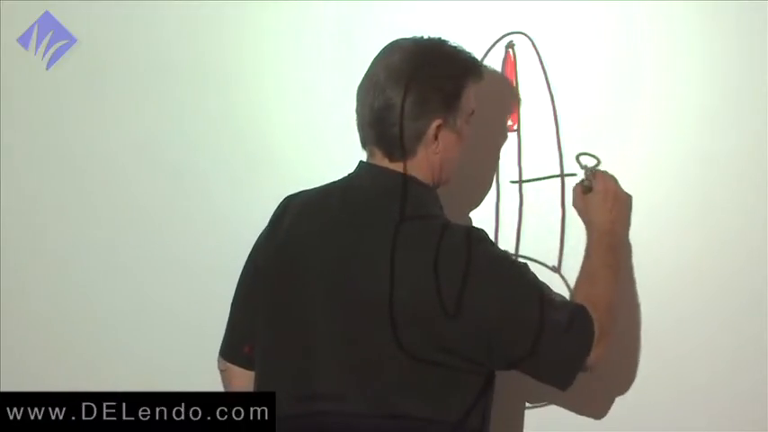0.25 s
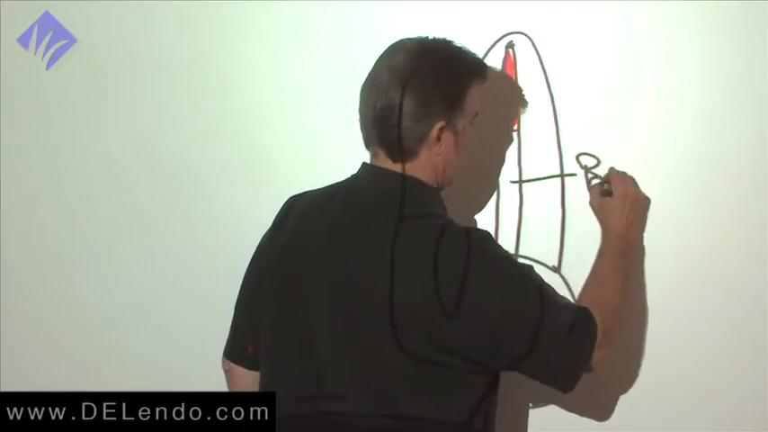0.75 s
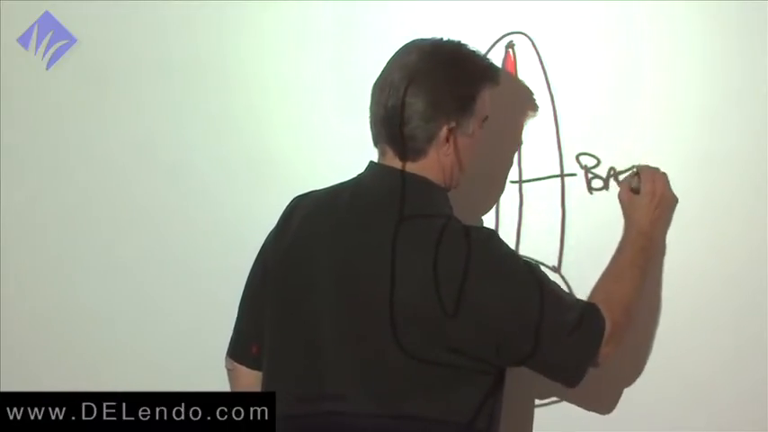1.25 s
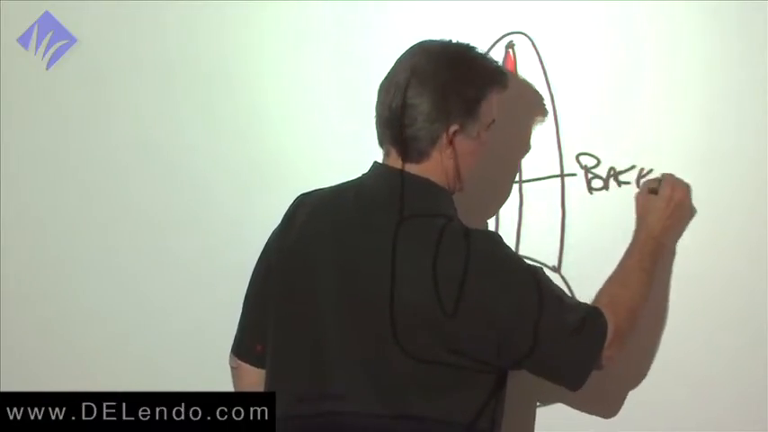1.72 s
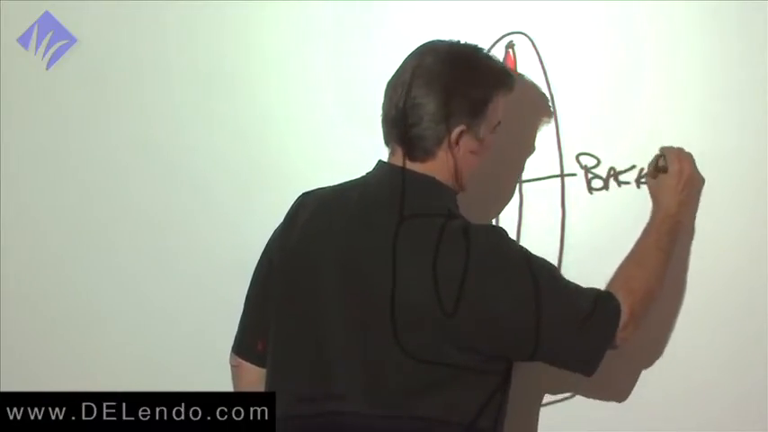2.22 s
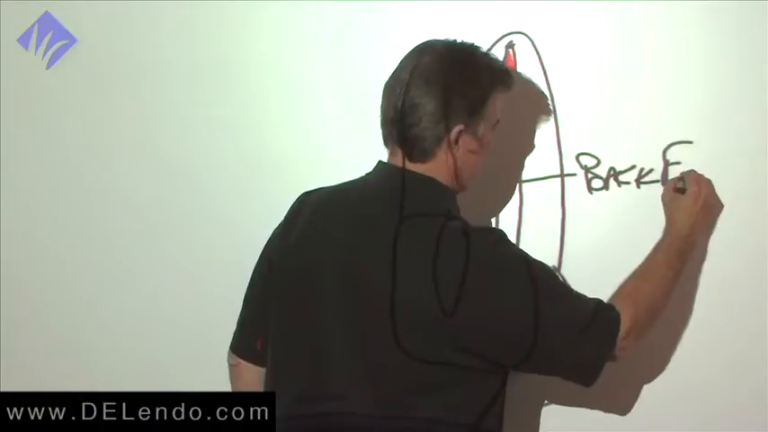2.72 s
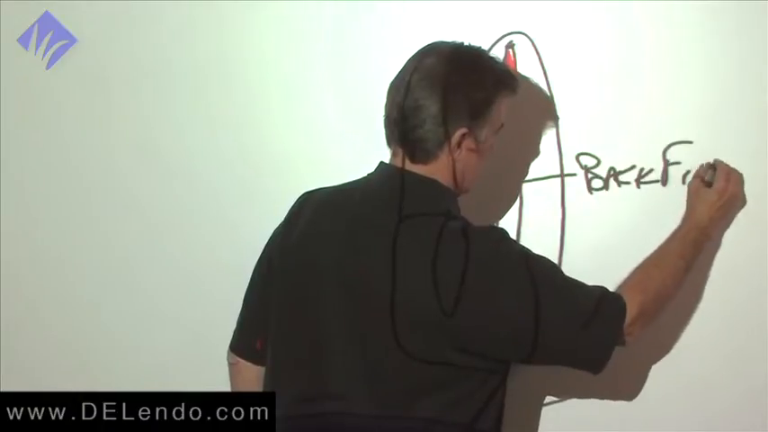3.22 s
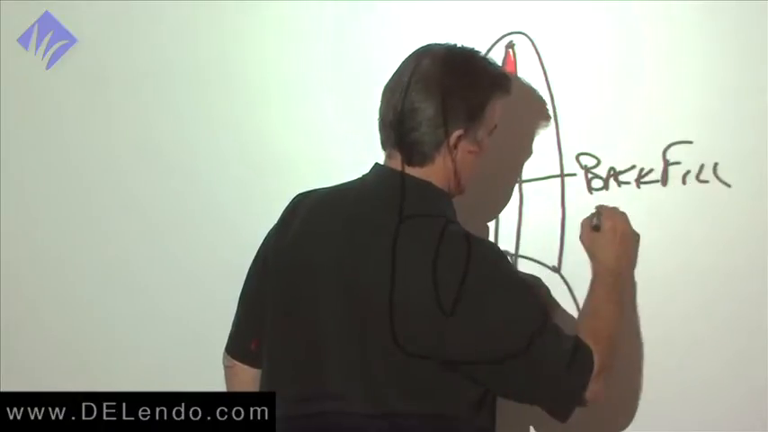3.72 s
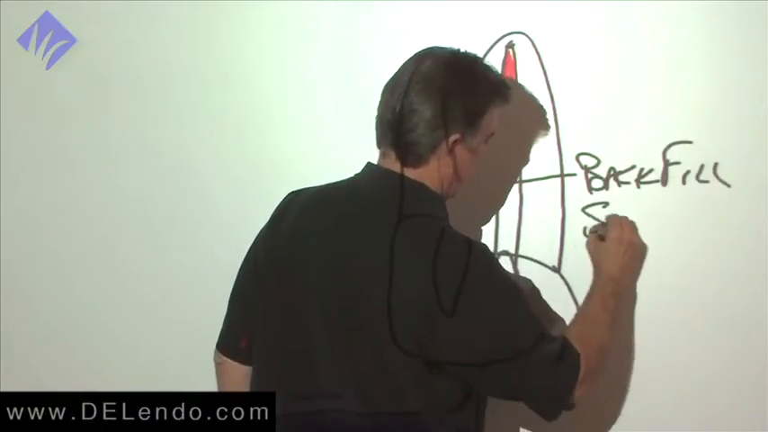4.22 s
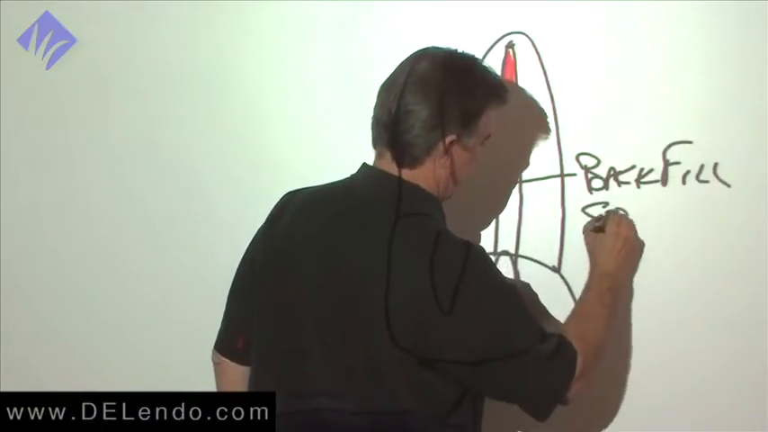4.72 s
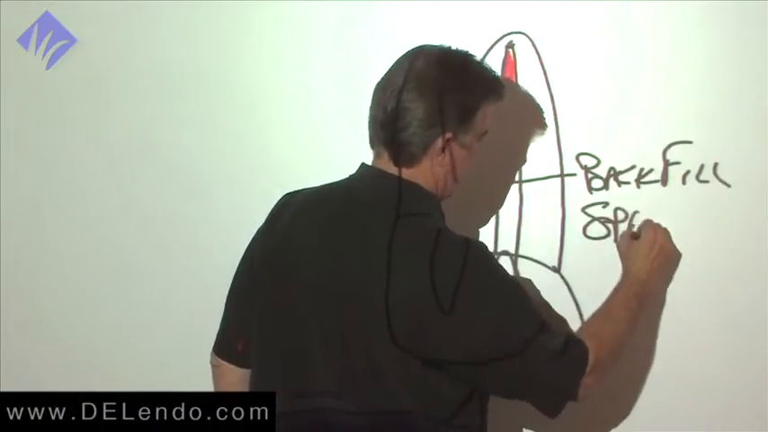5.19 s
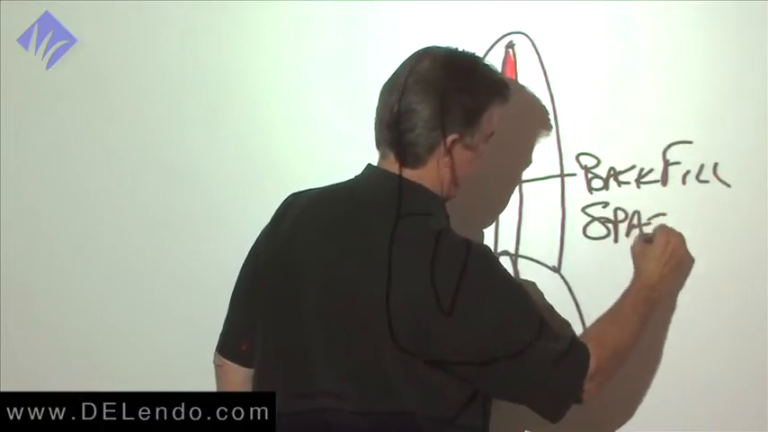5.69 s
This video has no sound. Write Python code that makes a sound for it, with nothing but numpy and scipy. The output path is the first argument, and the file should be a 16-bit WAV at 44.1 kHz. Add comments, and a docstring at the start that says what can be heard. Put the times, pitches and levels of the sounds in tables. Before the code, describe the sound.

In a small quiet room, a marker tip knocks and rubs across a ringing board in irregular bursts. Early strokes are run together and muffled, then firmer knocks come, two of them notably hard before three seconds. After a short pause the writing continues with steady low scuffs and lighter taps. Soft air noise, a low hum and a barely audible high whistle stay beneath; fairly close, slightly roomy pickup.

```python
"""Marker on a whiteboard, small room

A felt marker prints capital letters on a wall-hung whiteboard in a small, quiet room.
At each touch the tip ticks, then the nib seats in its barrel with a crack and thumps the ringing panel.
While it slides, the felt hisses and its tiny slips make the panel judder.
Reflections follow the marker's sound; soft room tone, a low hum and a thin whistle lie beneath."""
import sys
import numpy as np
from scipy import signal
from scipy.fft import rfft, irfft
from scipy.io import wavfile
from scipy.ndimage import uniform_filter1d

SR = 44100
rng = np.random.default_rng(int(sys.argv[2]) if len(sys.argv) > 2 else 0)


def file_out(sig):
    """Save sig as 16-bit WAV at sys.argv[1]."""
    # one column per channel
    cols = np.atleast_2d(sig).T
    # limit, then scale
    lim = np.clip(cols, -1, 1)
    pcm = np.round(lim * 32767).astype(np.int16)
    wavfile.write(sys.argv[1], SR, pcm)


N = 262395  # length in samples

# Room tone spectrum. Each row: frequency in Hz, relative level in dB.
ROOM_TONE_SPECTRUM = [(20, -18), (45, 4), (110, 3), (170, -1.5), (310, -4), (480, -12.5), (1000, -13),
                      (2000, -25), (4000, -30), (9000, -34), (16000, -35)]
# Steady electrical tones: hum and whistle. Each row: frequency in Hz, mean peak level in dB.
ELECTRICAL_TONES = [(58.7, -44.5), (118, -57.5), (15734, -71.5)]
# Strokes of the letters. Each row: start in seconds, length in seconds, fastest moment as a share
# of the length (0-1), judder in dB, sharp slips relative to the judder in dB, hiss in dB, sizzle in dB.
LETTER_STROKES = [(0.014, .13, 0.55, -35.5, -9, -62, -65), (0.13, 0.081, 0.38, -43, -6.5, -63, -62),
                  (0.203, 0.23, 0.16, -42.5, -8.5, -66, -68), (0.433, 0.13, 0.24, -42, -4, -64.5, -62.5),
                  (0.561, 0.12, .45, -48, -7, -62.5, -65), (0.793, 0.13, 0.57, -40, -6.5, -65, -66),
                  (0.939, 0.11, 0.28, -39.5, -7.5, -62, -62), (1.039, 0.096, .55, -39.5, -7, -63.5, -66),
                  (1.232, 0.13, 0.37, -43, -13, -63.5, -67.5), (1.498, 0.14, .52, -43.5, -8, -64, -64),
                  (1.63, 0.098, 0.63, -36, -7.5, -63, -62), (1.924, 0.13, 0.3, -34.5, -12, -63, -68),
                  (2.069, .17, 0.45, -37.5, -9.5, -65.5, -70), (2.196, 0.095, 0.82, -46.5, -4.5, -65, -59),
                  (2.277, 0.058, .45, -36.5, -10, -62, -66), (2.504, 0.13, .35, -35, -8, -64, -68),
                  (2.67, 0.11, 0.25, -41.5, -8, -66.5, -69), (2.922, 0.11, 0.24, -37.5, 1, -63, -71),
                  (3.0, 0.15, 0.38, -44.5, 1, -67, -67), (3.215, 0.076, .4, -46, -9, -61.5, -73),
                  (3.277, 0.093, .68, -41.5, -2.5, -64, -63), (3.72, 0.069, 0.33, -39.5, -8, -65, -66),
                  (3.794, 0.12, 0.37, -40, -10, -58.5, -62), (3.903, 0.12, 0.44, -35, -6, -59.5, -67),
                  (4.02, 0.093, 0.45, -42.5, -7, -62.5, -61.5), (4.109, 0.12, 0.42, -33, -5.5, -62.5, -66),
                  (4.211, 0.12, 0.22, -43.5, -5.5, -61.5, -64), (4.358, 0.18, 0.29, -40, -5.5, -62.5, -66),
                  (4.506, 0.1, 0.4, -49.5, -8.5, -66.5, -68), (4.587, 0.1, 0.45, -45, -7, -64, -63),
                  (4.841, .1, .35, -36.5, -11.5, -65, -69), (4.942, 0.15, 0.5, -35.5, -9.5, -63.5, -69),
                  (5.084, .15, 0.53, -39.5, -8, -62.5, -64.5), (5.347, 0.097, .5, -40.5, -8, -64, -66.5),
                  (5.511, 0.11, 0.64, -44.5, -11, -64, -62.5), (5.613, 0.097, 0.43, -38, -9, -62.5, -63)]
# Ringing modes of the panel. Each row: frequency in Hz, relative level in dB.
PANEL_RING_MODES = [(102, -12), (171, -9), (230, -7), (265, -6), (291, -4), (309, 1), (350, -7), (393, -4),
                    (445, -1), (505, -7), (545, -6), (571, -3), (612, -5), (645, -6), (734, -4), (846, -4),
                    (875, -1), (930, -7), (1022, -3), (1057, -7), (1098, -7), (1318, -19), (1367, -20),
                    (1510, -27), (1669, -29)]
# The panel's damped thud, as a spectrum. Each row: frequency in Hz, relative level in dB.
PANEL_THUD_SPECTRUM = [(30, -17), (90, -12.5), (160, -8), (210, -6.5), (295, 2), (365, -3.5), (450, -5),
                       (720, -5), (1050, -4), (1320, -18.5), (1900, -29), (2700, -40.5), (4500, -46.5),
                       (14000, -68.5)]
# Push of a soft slip on the panel, as a spectrum. Each row: frequency in Hz, relative level in dB.
SOFT_SLIP_SPECTRUM = [(60, -17), (170, -1.5), (300, -2), (440, -5.5), (590, -11.5), (1500, -33)]
# Push of a sharp slip, reaching the upper modes. Each row: frequency in Hz, relative level in dB.
SHARP_SLIP_SPECTRUM = [(300, -31), (520, -1), (735, 5), (900, -1.5), (1100, -6.5), (1600, -2.5), (4000, -6)]
# Felt hiss in the barrel's range. Each row: frequency in Hz, relative level in dB.
HISS_SPECTRUM = [(700, -0.5), (1600, 2.5), (2600, -8.5), (3700, -2), (5000, -1.5), (6200, -6), (7500, -9.5),
                 (9000, -12), (10500, -16), (16000, -44)]
# Fine felt sizzle above the hiss. Each row: frequency in Hz, relative level in dB.
SIZZLE_SPECTRUM = [(7000, -14.5), (10000, -10.5), (12500, -1), (14000, -1.5), (15500, 7.5), (16000, -25)]
# Marker meets board. Each row: moment the nib seats in seconds, speed of approach in m/s,
# thump in dB, hardness of the blow in dB.
BOARD_TOUCHES = [(0.7626, .17, -25, -14), (1.2152, 0.22, -23.5, -9), (1.4775, 0.25, -18, -11),
                 (1.9204, 0.35, -18, -9), (2.49, 0.61, -12.5, -2.16), (2.6607, .32, -21, -12.5),
                 (2.906, 0.68, -13.5, 1), (3.198, 0.43, -20, -4.5), (3.721, 0.3, -19.5, -8.5),
                 (4.827, .52, -18.5, -12), (5.3123, 0.22, -25, -20.5), (5.5059, 0.07, -31.5, -15),
                 (5.9372, 0.21, -24, -10)]
# The tip's tick, as a spectrum. Each row: frequency in Hz, relative level in dB.
TICK_SPECTRUM = [(500, -2.5), (2300, -11), (3500, -7.5), (5300, 1.5), (7300, -5), (10000, -15.5),
                 (16000, -25)]
# The barrel's crack, as a spectrum. Each row: frequency in Hz, relative level in dB.
CRACK_SPECTRUM = [(1000, 0.5), (2700, -14.5), (3700, -8.5), (5500, -20.5), (7500, -25.5), (10000, -37),
                  (16000, -35)]

ROOM_TONE_DB = -54  # mean level
# each layer grows as this power of the nib's speed: the judder needs more pace than hiss or sizzle
JUDDER_POWER, HISS_POWER, SIZZLE_POWER = 1.84, 0.39, 0.54
PANEL_T60_S = 0.26  # ring time at 400 Hz
RING_DB = -10  # gain of the ring when added to the thud
DISPERSION_S = 0.000774  # delay of bending waves at 300 Hz
NIB_PLAY_M = 0.001  # how far the nib slides back before it seats
TICK_DB, TICK_POWER = -34, 1.34  # the tip's tick at 1 m/s, and its growth with speed
CRACK_DB = -17  # the barrel's crack, relative to the thump
ROOM_T60_S, ROOM_T60_TREBLE_S = 0.36, 0.12
ROOM_DB, ROOM_TREBLE_DB = -9, -12.5  # gains of the two reflection bands
TOP_HZ = 16000  # top of the recorder's range


def amp(db):
    """Decibels to gain."""
    return 10 ** (np.asarray(db) / 20)


def unit(x):
    """Scale to rms 1."""
    return x / np.sqrt(np.mean(x ** 2))


def burst(x, seconds):
    """Scale a short sound to the energy of so many seconds at rms 1."""
    return x * np.sqrt(seconds * SR / np.sum(x ** 2))


def colour(points, size=4096):
    """Minimum-phase impulse response with the given (Hz, dB) spectrum, by folding the cepstrum."""
    hz, db = np.transpose(points)
    bins = np.maximum(np.arange(size // 2 + 1) * SR / size, 1)
    level_db = np.interp(np.log(bins), np.log(hz), db)
    cepstrum = irfft(np.log(amp(level_db)))
    cepstrum[1:size // 2] *= 2
    cepstrum[size // 2 + 1:] = 0
    return irfft(np.exp(rfft(cepstrum)))


def through(x, response):
    """Filter by an impulse response, keeping the length."""
    return signal.fftconvolve(x, response)[:len(x)]


def add(track, s, sound):
    """Mix a sound into the track at time s."""
    i = int(s * SR)
    track[i:i + len(sound)] += sound[:max(N - i, 0)]


def walk(rate):
    """Random levels held 1 / rate s and slewed twice, at rms 1."""
    hold = max(int(SR / rate), 1)
    steps = np.repeat(rng.standard_normal(N // hold + 1), hold)
    slewed = uniform_filter1d(uniform_filter1d(steps, hold), hold)
    return unit(slewed[:N])


def grains(rate, spread_db):
    """Tiny slips at random moments, rate per second on average, a few larger than the rest."""
    sizes = amp(spread_db * np.minimum(rng.exponential(size=N), 4))
    happens = rng.random(N) < rate / SR
    return unit(happens * sizes * rng.choice([-1, 1], N))


def background():
    """Soft room tone, a slightly wavering hum and the thin whistle of a picture tube."""
    t = np.arange(N) / SR
    air = unit(through(rng.standard_normal(N), colour(ROOM_TONE_SPECTRUM)))
    out = air * amp(ROOM_TONE_DB + 0.92 * walk(3.97))
    for hz, db in ELECTRICAL_TONES:
        level = amp(db + 0.31 * walk(8.7))
        out += level * np.sin(2 * np.pi * hz * t + 0.1 * walk(10))
    return out


def stroke_speed(length_s, fastest):
    """The hand gathers pace, is fastest part-way through the stroke and slows to rest (0-1)."""
    progress = np.linspace(0, 1, int(length_s * SR))
    peak = np.clip(fastest, 0.1, 0.9)
    half_turns = np.interp(progress, [0, peak, 1], [0, 0.5, 1])
    return np.abs(np.sin(np.pi * half_turns))


def stroke_levels():
    """Gains of the soft slips, sharp slips, hiss and sizzle; all follow the speed of the nib."""
    soft, sharp, hiss, sizzle = np.zeros((4, N))
    for s, length_s, fastest, judder_db, sharp_db, hiss_db, sizzle_db in LETTER_STROKES:
        speed = stroke_speed(length_s, fastest)
        add(soft, s, amp(judder_db) * speed ** JUDDER_POWER)
        add(sharp, s, amp(judder_db + sharp_db) * speed ** JUDDER_POWER)
        add(hiss, s, amp(hiss_db) * speed ** HISS_POWER)
        add(sizzle, s, amp(sizzle_db) * speed ** SIZZLE_POWER)
    return soft, sharp, hiss, sizzle


def panel_response():
    """The panel's answer to a blow at one spot: a broad, quickly damped thud, then its modes ring on."""
    t = np.arange(SR // 2) / SR
    thud = colour(PANEL_THUD_SPECTRUM, size=len(t))
    ring = np.zeros(len(t))
    for hz, db in PANEL_RING_MODES:
        # each spot drives the modes a little differently; low modes last longest
        gain = amp(db + 2 * rng.standard_normal())
        t60 = PANEL_T60_S * (400 / hz) ** 0.3
        decay = np.exp(-np.log(1000) * t / t60)
        ring += gain * np.sin(2 * np.pi * (hz * t + rng.random())) * decay
    # the modes build up as waves come back from the frame
    ring *= 1 - np.exp(-t / 0.001)
    blow = burst(thud, 0.016) + amp(RING_DB) * burst(ring, 0.044)
    # bending waves are slower at low pitch, so the bass arrives last
    bins = np.maximum(np.arange(len(t) // 2 + 1) * SR / len(t), 1)
    lag = DISPERSION_S * np.sqrt(300 / bins)
    phase = 2 * np.pi * np.cumsum(lag) * SR / len(t)
    response = irfft(rfft(blow) * np.exp(-1j * phase))
    fade = np.cos(np.pi / 2 * t / t[-1])
    return response * fade


def judder(soft_gain, sharp_gain):
    """The felt sticks and slips and shakes the panel; sharp slips reach its upper modes."""
    force = grains(rate=2300, spread_db=2) * amp(2.33 * walk(90))
    # the nib travels between two spots that ring differently
    travel = 1.156 * walk(3)
    out = np.zeros(N)
    for share in (np.cos(travel), np.sin(travel)):
        panel = panel_response()
        soft = burst(through(panel, colour(SOFT_SLIP_SPECTRUM)), 1 / SR)
        sharp = burst(through(panel, colour(SHARP_SLIP_SPECTRUM)), 1 / SR)
        slips = share * force * rng.choice([-1, 1], N)
        out += through(slips * soft_gain, soft)
        out += through(slips * sharp_gain, sharp)
    return out


def felt(hiss_gain, sizzle_gain):
    """Fibres flick over the smooth surface: a hiss in the barrel's range and a fine sizzle above it."""
    hiss = unit(through(grains(rate=9000, spread_db=0.5), colour(HISS_SPECTRUM)))
    hiss *= amp(1.16 * walk(40))
    sizzle = unit(through(grains(rate=15000, spread_db=3.0), colour(SIZZLE_SPECTRUM)))
    sizzle *= amp(1.9 * walk(30))
    return hiss * hiss_gain + sizzle * sizzle_gain


def contact(hard_db):
    """A soft contact pushes for longer and leaves the panel's upper modes out."""
    points = [(380, 0.0064), (650, 0.75 * hard_db), (1250, 1.62 * hard_db), (3000, 0.12 * hard_db)]
    return colour(points, size=512)


def touches():
    """The tip ticks; milliseconds later the nib seats with a crack and the hand's weight thumps the panel."""
    out = np.zeros(N)
    tick = burst(colour(TICK_SPECTRUM), 0.0024)
    crack = burst(colour(CRACK_SPECTRUM), 0.0013)
    t = np.arange(len(crack)) / SR
    for s, speed, thump_db, hard_db in BOARD_TOUCHES:
        # the barrel buzzes for an instant after the nib seats
        rattle = rng.standard_normal(len(t)) * np.exp(-t / 0.003)
        buzz = burst(through(rattle, crack), 0.0022)
        thump = through(panel_response(), contact(hard_db))
        # a faster approach takes up the nib's play sooner
        add(out, s - NIB_PLAY_M / speed, amp(TICK_DB) * speed ** TICK_POWER * tick)
        add(out, s, amp(thump_db + CRACK_DB) * (crack + amp(3.0) * buzz))
        add(out, s, amp(thump_db) * thump)
    return out


def room(x):
    """The direct sound plus diffuse reflections of a small room; the treble dies sooner."""
    t = np.arange(SR * 2 // 3) / SR
    # the first reflections fade in from 4 ms after the direct sound
    noise = rng.standard_normal(len(t)) * np.clip((t - 0.004) / 0.0015, 0, 1)
    long_tail = burst(noise * np.exp(-np.log(1000) * t / ROOM_T60_S), 1 / SR)
    short_tail = burst(noise * np.exp(-np.log(1000) * t / ROOM_T60_TREBLE_S), 1 / SR)
    low = signal.sosfilt(signal.butter(2, 1500, fs=SR, output="sos"), long_tail)
    high = signal.sosfilt(signal.butter(2, 1500, "high", fs=SR, output="sos"), short_tail)
    # the treble is inverted to stay in step with the low band at the crossover
    return x + through(x, amp(ROOM_DB) * low - amp(ROOM_TREBLE_DB) * high)


def scene():
    """Touches and strokes sound into the room, over the background."""
    soft, sharp, hiss, sizzle = stroke_levels()
    marker = touches() + judder(soft, sharp) + felt(hiss, sizzle)
    return (room(marker) + background())[None]


def record(dry):
    """The recorder clips at full scale and cuts the top."""
    top_cut = signal.ellip(10, 0.1, 70, TOP_HZ, fs=SR, output="sos")
    return signal.sosfilt(top_cut, np.clip(dry, -1, 1))


dry = scene()
out = record(dry)
file_out(out)
```